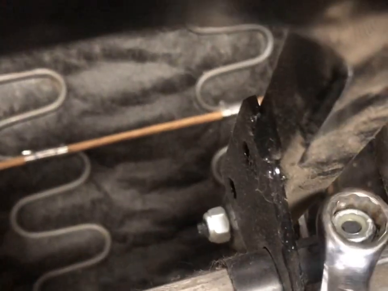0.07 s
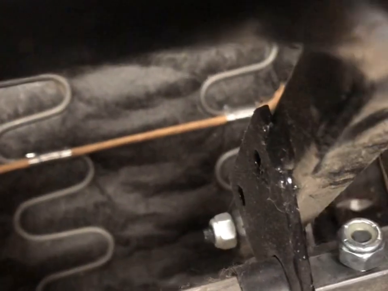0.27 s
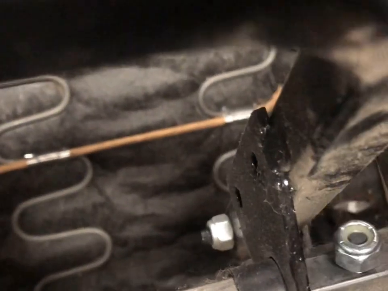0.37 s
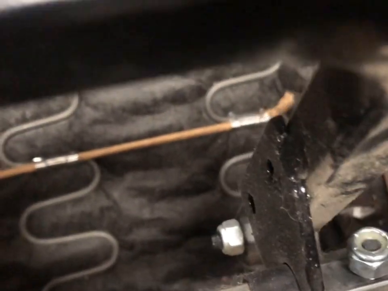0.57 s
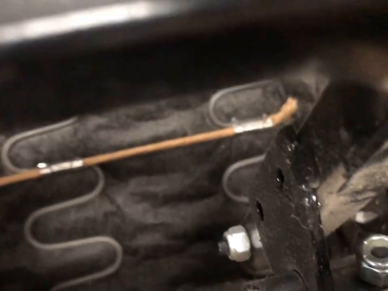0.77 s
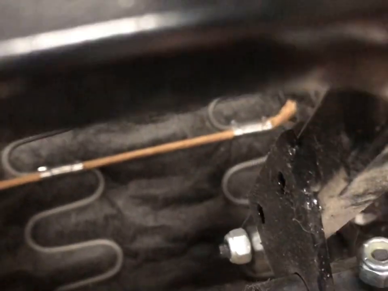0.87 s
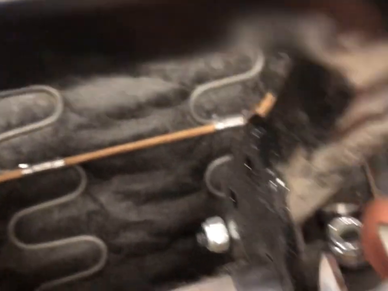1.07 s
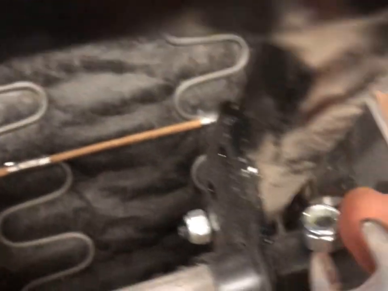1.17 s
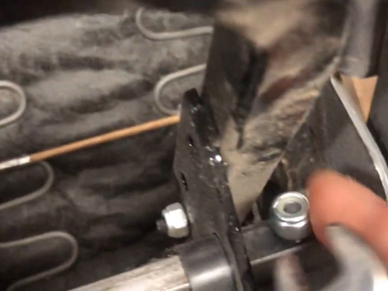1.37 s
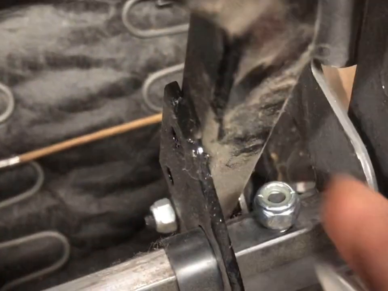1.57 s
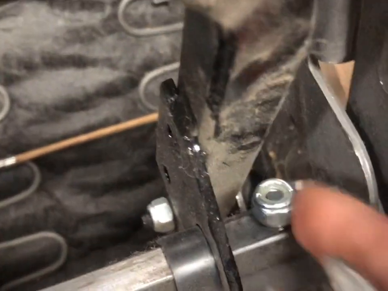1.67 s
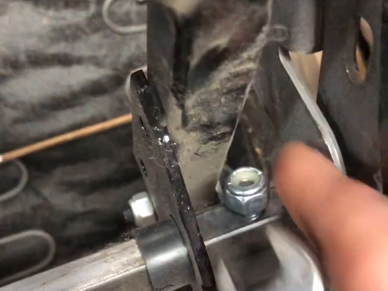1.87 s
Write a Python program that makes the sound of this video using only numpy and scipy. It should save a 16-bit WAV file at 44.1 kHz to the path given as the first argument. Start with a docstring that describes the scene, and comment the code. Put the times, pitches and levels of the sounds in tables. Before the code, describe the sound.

Sharp close clank of a ring wrench on a nut and steel frame, later faint handling taps

```python
"""A faint, wavering hum over room noise runs throughout: a tone of drifting pitch and level on filtered noise.
Close by, indoors, a steel ring wrench is lifted off a nut: it snaps against the nut, clanks on the steel
frame and rattles to rest, as decaying sine modes with noise cracks and thuds. Hand and tool then rub and
tap lightly on the parts: rubs are dense noise grains through steel resonances, taps are damped modes.
The metal sounds excite a faint room tail."""
import sys
import numpy as np
from scipy import signal
from scipy.fft import rfft, irfft
from scipy.io import wavfile

SR = 44100
rng = np.random.default_rng(int(sys.argv[2]) if len(sys.argv) > 2 else 0)


def wav_out(sig):
    """Save sig, one row per channel (or a flat mono array), as 16-bit PCM at SR to the path in sys.argv[1]."""
    wavfile.write(sys.argv[1], SR, np.round(np.clip(np.atleast_2d(sig).T, -1, 1) * 32767).astype(np.int16))


N = 83790

# Spectrum of the dense low response of heavy steel. Each row: frequency in Hz, relative level in dB.
THUD_SPECTRUM = [(40, -26), (130, -6.5), (750, -3), (1300, -6), (2200, -7.5), (6000, -24), (15000, -48)]
# Spectrum without colour. Each row: frequency in Hz, relative level in dB.
FLAT_SPECTRUM = [(0, 0), (SR / 2, 0)]


def amp(db):
    """Level law: decibels to amplitude gain."""
    return 10 ** (np.asarray(db) / 20)


def unit(x):
    """Power normalisation: scales to rms 1."""
    return x / np.sqrt(np.mean(x ** 2) + 1e-20)


def read(points, hz):
    """Interpolates a table linearly on a logarithmic frequency axis."""
    f, value = np.transpose(points)
    return np.interp(np.log(hz + 1), np.log(f + 1), value)


def add(mix, s, sound):
    """Superposition: mixes a sound in at time s, in seconds."""
    part = mix[max(round(s * SR), 0):][:len(sound)]
    part += sound[:len(part)]


def colour(x, db_at):
    """Linear filtering: multiplies the spectrum by a gain given as a function from Hz to dB."""
    hz = np.fft.rfftfreq(len(x), 1 / SR)
    return irfft(rfft(x) * amp(db_at(hz)), len(x))


def edge(x, hz, kind, order=2):
    """Butterworth low-pass or high-pass: maximally flat below or above its cutoff."""
    sos = signal.butter(order, min(hz, .45 * SR), kind, fs=SR, output="sos")
    return signal.sosfilt(sos, x)


def wobble(size, per_s):
    """Low-passed noise: a smooth random curve of rms 1, its spectrum 6 dB down at per_s Hz."""
    return unit(colour(rng.standard_normal(size), lambda hz: -20 * np.log10(1 + (hz / per_s) ** 4)))


def dying_noise(spectrum, t60, size=16384):
    """High modal density: resonances merge into noise whose bands each decay at their own rate."""
    t = np.arange(size) / SR
    noise = rng.choice([-1., 1.], size)
    noise_spectrum = rfft(unit(colour(noise, lambda hz: read(spectrum, hz))))
    octave = np.log2(np.fft.rfftfreq(size, 1 / SR) + 1)
    centres = np.geomspace(120, 15000, 5)
    out = np.zeros(size)
    for hz, share in zip(centres, np.eye(len(centres))):
        # overlapping triangular bands on an octave axis
        band = irfft(noise_spectrum * np.interp(octave, np.log2(centres), share), size)
        out += band * np.exp(-np.log(1000) * t / read(t60, hz))
    return out


def ring(modes, size=16384):
    """Modal superposition: a struck body sounds as exponentially decaying sines, alternating in sign."""
    onset_s = .0003  # time constant of the rise
    t = np.arange(size) / SR
    tone = np.zeros(size)
    for k, (hz, db, t60) in enumerate(modes):
        decay = np.exp(-np.log(1000) * t / t60)
        tone += (-1) ** k * amp(db) * decay * np.sin(2 * np.pi * hz * t)
    return tone * (1 - np.exp(-t / onset_s))


def swell(body):
    """Inertia: heavy parts answer a little after the contact, with an exponential rise."""
    rise_s = .0033
    return body * (1 - np.exp(-np.arange(len(body)) / SR / rise_s))


def crack(spectrum):
    """Broadband contact impulse: a sharp snap excites lumpy dense resonances, drawn anew each time."""
    # Decay of the dense steel response. Each row: frequency in Hz, t60 in seconds.
    crack_decay = [(500, .05), (3000, .03), (14000, .016)]
    gain_db = -16
    lump_depth_db, lump_hz = 1.7, 200  # rms depth and correlation width along frequency
    snap, snap_s = .5, .0008  # extra strength of the first instant and its time constant
    hz = np.arange(0, SR / 2, 100)
    smoothing = np.exp(-hz[1] / lump_hz)
    lumps = unit(signal.lfilter([1], [1, -smoothing], rng.standard_normal(len(hz))))
    lumpy_spectrum = np.c_[hz, read(spectrum, hz) + lump_depth_db * lumps]
    clack = dying_noise(lumpy_spectrum, crack_decay, size=2048)
    return amp(gain_db) * clack * (1 + snap * np.exp(-np.arange(len(clack)) / SR / snap_s))


def background():
    """Tone in noise: a sine wavers in level and drifts to a lower pitch, over quiet room noise."""
    # Course of the hum. Each row: time in seconds, frequency in Hz, relative level in dB before the waver.
    hum_course = [(0, 121.5, -58.5), (.45, 126.6, -65.5), (.59, 114.1, -60.5), (.7, 128.4, -65),
                  (1.04, 123.2, -61), (1.2, 109.4, -68.5), (1.45, 110, -64.5), (1.9, 111, -62.5)]
    # Spectrum of the room noise. Each row: frequency in Hz, relative level in dB.
    air_spectrum = [(35, -18.5), (58, -2), (120, -1), (200, -11), (320, -17), (450, -14), (700, -23),
                    (2000, -31.5), (15000, -42)]
    waver_db, waver_hz, air_db = 1.5, 12, -63.5
    t = np.arange(N) / SR
    s, hz, db = np.transpose(hum_course)
    level = amp(np.interp(t, s, db) + waver_db * wobble(N, waver_hz))
    phase = 2 * np.pi * np.cumsum(np.interp(t, s, hz)) / SR
    hum = level * unit(np.sin(phase))
    air = unit(colour(rng.standard_normal(N), lambda f: read(air_spectrum, f)))
    return hum + amp(air_db) * air


def room(dry):
    """Reverberation: convolution with a decaying noise tail of unit energy, dulled in the treble."""
    # Decay of the room. Each row: frequency in Hz, t60 in seconds.
    room_decay = [(150, .9), (1000, .22), (5000, .25), (14000, .26)]
    room_db, top_hz = -18.5, 9000
    tail = dying_noise(FLAT_SPECTRUM, room_decay)
    wet = signal.fftconvolve(dry, tail / np.linalg.norm(tail))[:N]
    return amp(room_db) * edge(wet, top_hz, "low", order=1)


def rub(length, centre_hz, octaves, size=8192):
    """Friction: dense tiny slips excite the steel's resonances, swelling and fading with the stroke."""
    # Steel resonances under the rubs. Each row: frequency in Hz, width in Hz, boost in dB.
    rub_body = [(3152, 90, 10.5), (4130, 260, 9), (6350, 160, 7)]
    grains_per_s, grain_spread_db = 14000, 1.8
    flutter_db, flutter_hz = 2, 55  # uneven grip
    swell_power = 1.05

    def steel_db(hz):
        resonances = sum(db / (1 + ((hz - f) / width) ** 2) for f, width, db in rub_body)
        distance = np.log2((hz + 1) / centre_hz) / octaves
        return resonances - 10 * np.log10(1 + distance ** 4)

    slips = rng.standard_normal(size) * (rng.random(size) < grains_per_s / SR)
    slips *= amp(grain_spread_db * rng.exponential(1, size))
    grit = colour(slips, steel_db)
    stroke = np.minimum(np.arange(size) / SR / length, 1)  # progress from 0 to 1
    arch = (4 * stroke * (1 - stroke)) ** swell_power
    return unit(grit * amp(flutter_db * wobble(size, flutter_hz))) * arch


def rubs():
    """Sliding contact: each stroke of hand and tool is a separate burst of friction noise."""
    # Strokes. Each row: start in seconds, length in seconds, level in dB before the swell,
    # centre in Hz, width in octaves (from the centre to 3 dB down).
    strokes = [(.088, .05, -68.5, 14200, .9), (.298, .066, -47, 3500, .9), (.514, .13, -70.5, 15000, .97),
               (.65, .057, -61.5, 16200, .68), (.709, .032, -53, 17400, .7), (.712, .033, -62, 2500, 2.7),
               (.94, .083, -71.5, 4500, 1.1), (1.307, .12, -65.5, 2930, 1.3),
               (1.358, .061, -63.5, 2800, 1.65), (1.469, .075, -65, 4200, 1.75),
               (1.519, .078, -65.5, 4500, 2.5), (1.668, .062, -60.5, 3000, 1.3),
               (1.713, .071, -62, 5000, 6), (1.845, .086, -64, 7000, 6.6)]
    out = np.zeros(N)
    for s, length, db, centre_hz, octaves in strokes:
        add(out, s, amp(db) * rub(length, centre_hz, octaves))
    return out


def taps():
    """Damped impact: the hand shortens the ring; a clack leads a hollow shaft knock that swells after it."""
    # Taps of the held wrench. Each row: time in seconds, relative level in dB, then ring and thud
    # in dB relative to that level, low edge and high edge of the clack in Hz.
    tap_list = [(1.190, -38, -12, 9.5, 1110, 3800), (1.198, -38, -18, 6, 1100, 5000),
                (1.394, -39.5, -15, 12, 606, 3500), (1.479, -35, -11, 3, 2100, 5800),
                (1.696, -36, -12, -6, 2600, 4200), (1.708, -26, -14.5, -15, 2400, 7300),
                (1.7627, -23.5, -12, 11.5, 1000, 2400), (1.796, -33, -12, 8, 1100, 3250),
                (1.8093, -22.5, 3, -3.5, 2800, 9200), (1.812, -22, -6, 8.5, 800, 4800),
                (1.8552, -29.5, -10, -20, 3200, 5450)]
    # Modes of the wrench in the hand. Each row: frequency in Hz, relative level in dB, t60 in seconds.
    held_modes = [(2958, -20.5, .027), (3830, -22, .03), (4795, -17, .025), (5566, -11, .02),
                  (6280, -24, .03), (12210, -35.5, .12)]
    # Modes of the shaft. Each row: frequency in Hz, relative level in dB, t60 in seconds.
    shaft_modes = [(291, -43, .12), (571, -36, .09), (750, -31.5, .07), (1066, -39, .07), (1453, -30, .04),
                   (1870, -30, .04)]
    # Decay of the low thud under a tap. Each row: frequency in Hz, t60 in seconds.
    tap_thud_decay = [(150, .3), (4000, .05)]
    thud_noise_db = -30.5
    out = np.zeros(N)
    held, shaft = ring(held_modes), ring(shaft_modes, size=8192)
    for s, db, ring_db, thud_db, low_hz, high_hz in tap_list:
        clack = edge(edge(crack(FLAT_SPECTRUM), low_hz, "high"), high_hz, "low", order=3) * 2
        thud_noise = dying_noise(THUD_SPECTRUM, tap_thud_decay, size=8192)
        add(out, s, amp(db) * clack)
        add(out, s, amp(db + ring_db) * held)
        add(out, s, amp(db + thud_db) * swell(shaft + amp(thud_noise_db) * thud_noise))
    return out


def thud(favoured_hz):
    """Modal participation: the frame rings most in the modes that suit the point of contact."""
    # Modes of the frame. Each row: frequency in Hz, relative level in dB at the favoured pitch, t60 in seconds.
    frame_modes = [(157, -45, .32), (290, -43, .22), (360, -44, .12), (438, -33.5, .17), (581, -34, .11),
                   (640, -41, .12), (718, -39, .18), (1025, -39, .13), (1141, -42, .14)]
    # Decay of the dense low response. Each row: frequency in Hz, t60 in seconds.
    thud_decay = [(120, 0.34), (600, 0.15), (4000, 0.1)]
    off_point_db, point_octaves = 10, .3  # greatest weakening of the other modes; width of favour
    noise_db = -38.5
    modes = []
    for hz, db, t60 in frame_modes:
        distance = np.log2(hz / favoured_hz) / point_octaves
        modes.append((hz, db - off_point_db * (1 - np.exp(-distance ** 2)), t60))
    return swell(ring(modes) + amp(noise_db) * dying_noise(THUD_SPECTRUM, thud_decay))


def knocks():
    """Coupled impact: each knock of the loose wrench rings nut, wrench and frame by its own amounts."""
    # Knocks. Each row: time in seconds, relative levels of nut ring, wrench ring and frame thud in dB,
    # favoured frame pitch in Hz, relative crack level in dB, low edge and high edge of the crack in Hz.
    knock_list = [(.178, -37, -35, -18, 1400, -23.5, 249, 8500),
                  (.186, -61, -54.5, -8, 650, -38, 200, 4950),
                  (.216, -40, -63.5, -40, 650, -41.5, 4000, 15000),
                  (.238, 3.5, -32, -1, 320, 4, 3800, 16200), (.2734, -18, 5.5, 2, 581, 0, 250, 14000),
                  (.2855, -24, -26, 1, 160, -9, 200, 3300), (.314, -55, -55, 2, 438, -30, 200, 2000),
                  (.325, -36, -45, -2, 1100, -9, 200, 4200), (.3365, -42, -18.5, -3, 718, -13, 200, 7000),
                  (.3495, -46, -26, -13, 718, -13, 200, 5200)]
    # Modes of the nut. Each row: frequency in Hz, relative level in dB, t60 in seconds.
    nut_modes = [(1975, -42, .13), (2780, -36, .04), (3130, -25, .022), (4820, -30, .028), (6370, -23, .02),
                 (8160, -41, .14), (9582, -15, .042), (9760, -15, .01), (12080, -23, .022),
                 (12760, -19, .034), (13660, -31, .04), (14942, -30, .055)]
    # Modes of the loose wrench. Each row: frequency in Hz, relative level in dB, t60 in seconds.
    wrench_modes = [(1952, -40, .1), (2767, -65, .42), (2926, -38.5, .05), (3990, -23, .018),
                    (4078, -39, .18), (4069, -63, .52), (5322, -56, .26), (5556, -58, .27),
                    (5598, -30, .045), (5731, -30, .048), (5957, -16.5, .021), (5950, -59, .28),
                    (8500, -32, .03), (8905, -26.5, .034), (9150, -20, .013), (9489, -33, .043),
                    (12211, -45, .13), (13502, -36, .052)]
    # Dense response of the steel to a contact. Each row: frequency in Hz, relative level in dB.
    crack_spectrum = [(100, -35), (600, -17), (1500, -4.5), (3000, -5.5), (9000, 2), (15500, 1)]
    out = np.zeros(N)
    nut, wrench = ring(nut_modes), ring(wrench_modes)
    for s, nut_db, wrench_db, frame_db, frame_hz, crack_db, low_hz, high_hz in knock_list:
        add(out, s, amp(nut_db) * nut + amp(wrench_db) * wrench + amp(frame_db) * thud(frame_hz))
        clack = edge(edge(crack(crack_spectrum), low_hz, "high"), high_hz, "low")
        add(out, s, amp(crack_db) * clack)
    return out


def scene():
    """Superposition of the background, the close metal sounds and their faint room tail."""
    metal = rubs() + taps() + knocks()
    return (background() + room(metal) + metal)[None]


def record(dry):
    """Soft saturation: tanh rounds the loud peaks, at twice the rate against aliasing; then a band limit."""
    overload, edge_hz = 1, 16200  # saturation level; top of the band in Hz
    low_pass = signal.firwin(255, edge_hz, window=("kaiser", 9), fs=SR)
    fine = signal.resample_poly(dry, 2, 1, axis=1)
    squashed = signal.resample_poly(overload * np.tanh(fine / overload), 1, 2, axis=1)
    return signal.oaconvolve(squashed, low_pass[None], "same")


dry = scene()
out = record(dry)
wav_out(out)
```